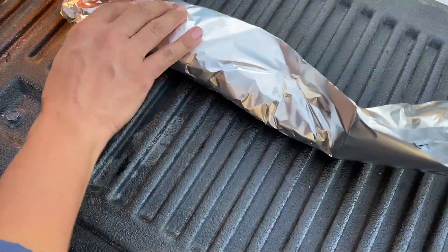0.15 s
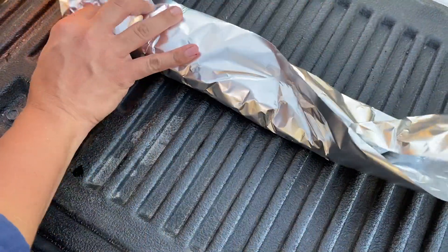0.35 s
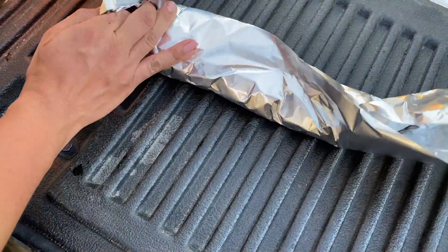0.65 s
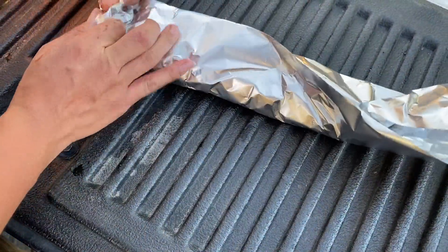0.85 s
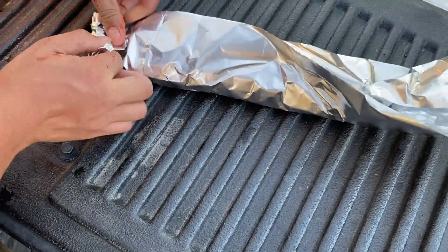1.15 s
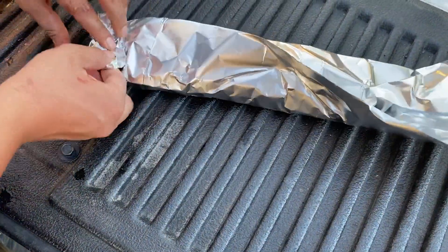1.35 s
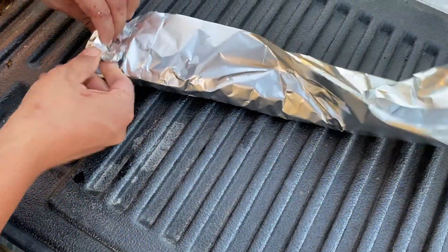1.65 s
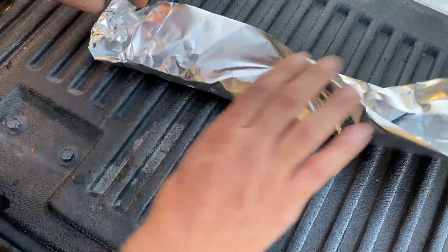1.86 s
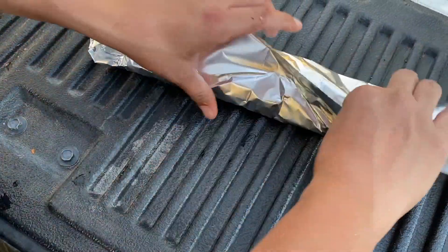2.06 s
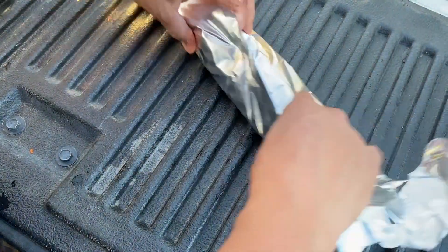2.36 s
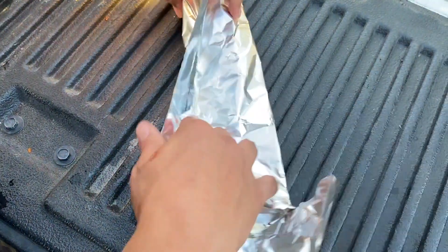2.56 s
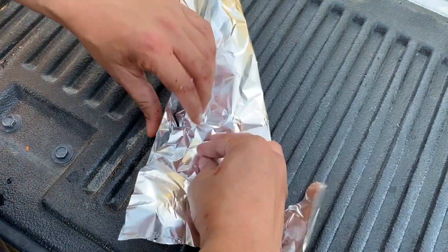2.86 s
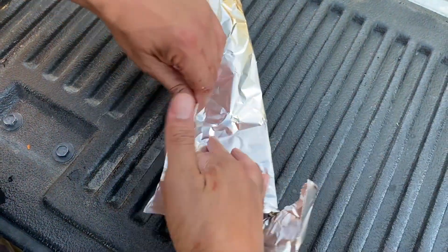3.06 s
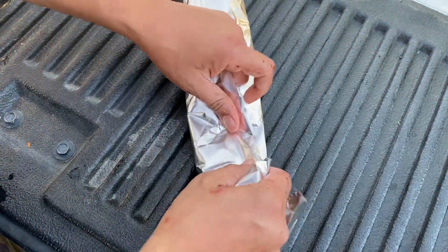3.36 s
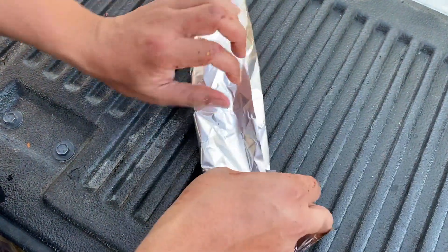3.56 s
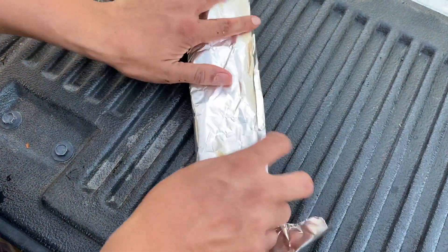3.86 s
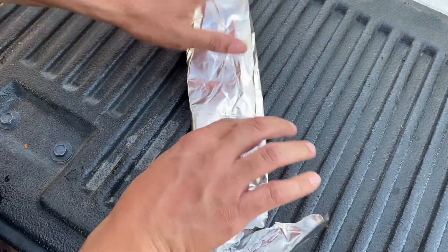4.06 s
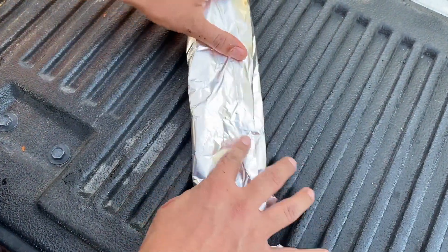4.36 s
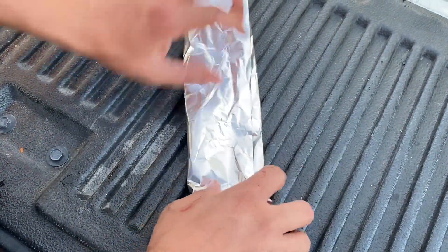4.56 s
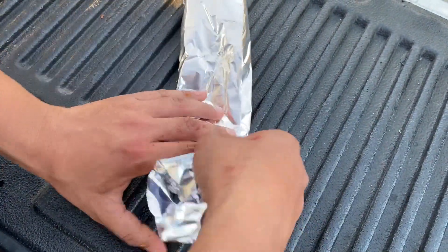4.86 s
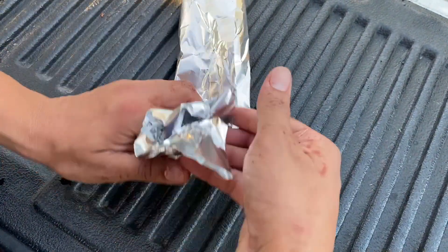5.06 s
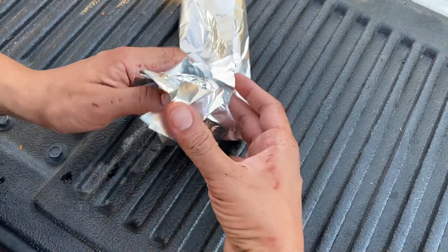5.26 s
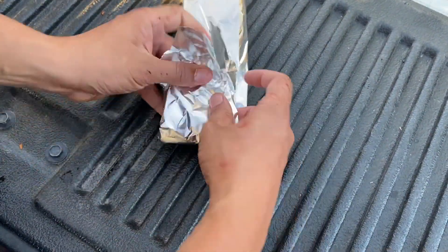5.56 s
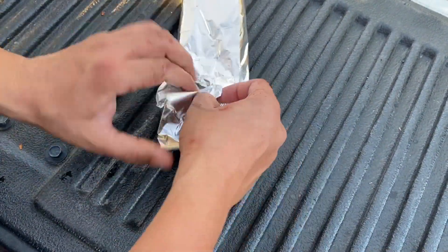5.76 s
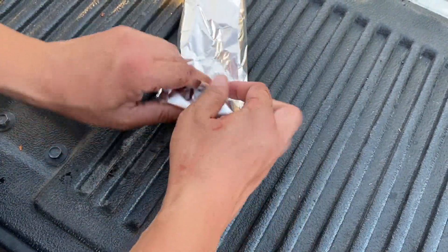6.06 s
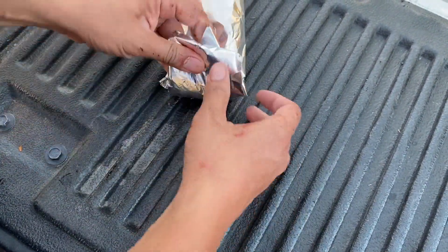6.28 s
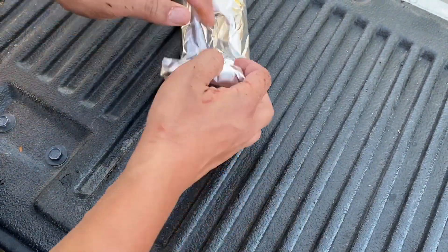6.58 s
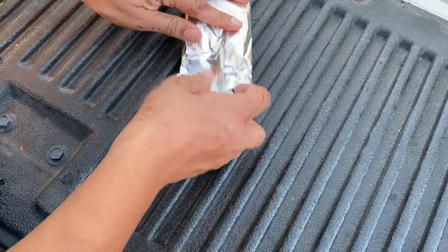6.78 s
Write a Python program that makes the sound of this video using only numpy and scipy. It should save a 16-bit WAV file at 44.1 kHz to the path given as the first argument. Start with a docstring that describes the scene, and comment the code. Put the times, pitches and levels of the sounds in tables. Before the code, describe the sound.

Crisp close foil crinkling in uneven bursts, light at first then busy and loud, over dull knocks and brief rubs on hollow ribbed plastic.

```python
"""Crimping foil in a truck bed

Hands fold and crimp aluminium foil round a long parcel of food on the plastic liner of a truck bed.
The foil buckles in swarms of tiny clicks and sharp single snaps; taut panels pop and one slip squeaks.
The parcel bumps and slides on the hollow liner, shaped noise with low resonances, in quiet outdoor air.
The bed adds short decaying echoes; two close ports hear it all and are cross-fed to widen the image.
"""
import sys
import numpy as np
from scipy import signal
from scipy.fft import rfft, irfft, next_fast_len
from scipy.io import wavfile
from scipy.ndimage import uniform_filter1d, map_coordinates

SR = 44100
rng = np.random.default_rng(int(sys.argv[2]) if len(sys.argv) > 2 else 0)


def store_pcm(level_fs):
    """Save levels as 16-bit WAV."""
    pcm = np.round(np.clip(level_fs, -1, 1) * 32767).astype(np.int16)
    wavfile.write(sys.argv[1], SR, np.atleast_2d(pcm).T)


N = 305157  # length [samples]
TOP_HZ = 15900  # band limit


def amp(db):
    """Level law: decibels to amplitude gain."""
    return 10 ** (np.asarray(db) / 20)


def power(db):
    """Level law: decibels to power, with a floor far below hearing."""
    return np.exp(np.maximum(db, -200) * np.log(10) / 10)


def unit(x):
    """Normalisation to an rms of 1."""
    return x / np.sqrt(np.mean(x ** 2) + 1e-20)


def along(points, hz):
    """Interpolation of (frequency, value) points on a logarithmic frequency axis."""
    f, v = np.transpose(points)
    return np.interp(np.log(hz + 1), np.log(f + 1), v)


def filtered(x, response):
    """Linear filtering: the spectrum of x times a response of frequency."""
    m = next_fast_len(N + SR // 2)
    spectrum = rfft(x, m) * response(np.fft.rfftfreq(m, 1 / SR))
    return irfft(spectrum, m)[..., :N]


def coloured(x, spectrum):
    """Spectral shaping of x by a table of levels, at rms 1."""
    return unit(filtered(x, lambda hz: amp(along(spectrum, hz))))


def placed(times, sounds):
    """Superposition of sounds (channels, events, samples) starting at their times."""
    starts = np.maximum(times * SR, 0).astype(int)
    at = (starts[:, None] + np.arange(sounds.shape[-1])).ravel()
    return np.array([np.bincount(at, side.ravel(), N)[:N] for side in sounds])


def wobble(rate):
    """Random modulation: a smooth curve with rate knots a second."""
    knots = rng.standard_normal(N // 100)
    return map_coordinates(knots, [np.arange(N) * rate / SR], mode="mirror")


def wide(shape, side_db=-14):
    """Partial coherence: noise of a broad surface, mostly shared by the ports, a little of it opposed."""
    mid, side = rng.standard_normal((2, *shape))
    return np.array([mid + amp(side_db) * side, mid - amp(side_db) * side])


def hand_time(size=32):
    """Control-rate sampling: times [s] coarse enough for the slow movements of the hands."""
    return np.arange(0, N, size) / SR


def per_sample(control):
    """Linear interpolation of a slow control to one value per sample."""
    return np.interp(np.arange(N) / SR, hand_time(), control)


# crackle builds as the fingers bear down and falls soon after they let go
GRIP_DB_PER_S, RELEASE_DB_PER_S = 1051.5, 749.5
# the foil keeps settling: level under the push, then a slower fade
SETTLE_DB, SETTLE_DB_PER_S = -16, 216


def stroke(start, length, db, swell_db):
    """Exponential build and relaxation: dB level of one push, which swells or eases, lets go and settles."""
    t = hand_time() - start
    early, late = np.maximum(-t, 0), np.maximum(t - length, 0)
    held = db + swell_db * (np.clip(t / length, 0, 1) - .5)
    release = np.maximum(-RELEASE_DB_PER_S * late, SETTLE_DB - SETTLE_DB_PER_S * late)
    return held + release - GRIP_DB_PER_S * early


# spectrum of the open air: (frequency [Hz], relative level [dB])
AIR_SPECTRUM = [(70, 4), (250, 44), (1000, 37), (16000, -66)]


def air(level_db=-74.5):
    """Diffuse field: steady shaped noise, independent at the two ports."""
    return amp(level_db) * coloured(rng.standard_normal((2, N)), AIR_SPECTRUM)


# ring time of the side walls: (frequency [Hz], 60 dB decay time [s])
BED_DECAY = [(200, 0.28), (2000, 0.84), (14000, 0.0057)]


def bed(x, near_db=-11, far_db=-22):
    """Reverberation: the ribbed floor answers at once, duller than the foil; the side walls ring longer."""
    near_t60 = .04  # s
    wall_hz, t, z = signal.stft(rng.standard_normal((2, SR // 4)), SR, nperseg=256)
    decay = amp(-60 * t / along(BED_DECAY, wall_hz)[:, None])
    far = signal.istft(z * decay, SR, nperseg=256)[1]
    near = rng.standard_normal(far.shape) * amp(-60 * np.arange(far.shape[1]) / SR / near_t60)
    echo = amp(near_db) * near / np.linalg.norm(near[0]) + amp(far_db) * far / np.linalg.norm(far[0])
    dull = filtered(x, lambda hz: 1 / (1 + (hz / 11000) ** 2))
    delayed = np.pad(dull, ((0, 0), (SR // 1000, 0)))  # 1 ms
    return signal.fftconvolve(delayed, echo, axes=1)[:, :N]


# spectrum of the hollow liner, for slides and bumps: (frequency [Hz], relative level [dB])
LINER_SPECTRUM = [(25, -11), (60, 10.5), (205, 2), (470, 0.5), (620, -4.5), (1200, -2), (4000, -10)]
# the parcel is dragged over the liner: (start [s], length [s], relative level midway [dB],
# swell from start to end [dB], centre of the rumble [Hz])
DRAG_STROKES = [(0.023, 0.27, -58.5, -11.5, 130), (1.822, 0.19, -55, 0, 95), (2.077, 0.49, -47, 3, 324),
                (3.298, 0.32, -54, -7, 93.5), (5.766, 0.43, -58.5, 3.5, 196),
                (6.478, 0.092, -66, -4.5, 394)]
SHAKE_DB, SHAKE_HZ = -22.5, 477  # liner shaken by the hands: level relative to the crackle, band centre


def slide(crackle_db, rough_db=4.5, catches_per_s=45, width=1.856):
    """Friction excitation: the parcel catches on the ribs, the liner rumbles; the hands shake it too."""
    rub = coloured(wide((N,)), LINER_SPECTRUM)

    def rumble(hz):
        """Band-pass resonance of the rubbed liner, from hz / width to hz * width."""
        band = signal.butter(2, [hz / width, hz * width], "band", fs=SR, output="sos")
        return unit(signal.sosfilt(band, rub))

    drags = sum(per_sample(amp(stroke(*push))) * rumble(hz) for *push, hz in DRAG_STROKES)
    shaken = amp(crackle_db + SHAKE_DB) * rumble(SHAKE_HZ)
    return (drags + shaken) * amp(rough_db * wobble(catches_per_s))


# the parcel bumps on the liner: (time [s], relative peak level [dB], reference pitch [Hz])
PARCEL_BUMPS = [(0.085, -34, 370), (1.237, -41, 260), (1.469, -38.5, 142), (1.674, -34, 370),
                (1.698, -35, 188), (3.322, -31, 158), (3.379, -31.5, 166), (3.519, -32.5, 133),
                (3.557, -33.5, 182), (3.662, -33, 204), (3.682, -30, 148), (4.101, -44, 308),
                (4.608, -31.5, 264), (4.716, -28.5, 223), (5.663, -27, 276), (6.015, -37, 240),
                (6.135, -36, 204), (6.254, -38.5, 380), (6.81, -36, 292)]


def bumps(octaves=0.52, size=8192):
    """Impact excitation: a short knock on the hollow liner, with a lower thud as the weight settles."""
    s, db, pitch = np.transpose(PARCEL_BUMPS)
    lead_s = .01
    t, hz = np.maximum(np.arange(size) / SR - lead_s, 0), np.fft.rfftfreq(size, 1 / SR)

    def shudder(ratio, t60, attack):
        """Modal density: decaying noise round a multiple of the reference pitch."""
        shake = wide((len(s), size)) * amp(-60 * t / t60) * (1 - np.exp(-t / attack))
        hump = np.exp(-.5 * (np.log2((hz + 1) / (ratio * pitch[:, None])) / octaves) ** 2)
        return irfft(rfft(shake) * hump * amp(along(LINER_SPECTRUM, hz)))

    knock = shudder(ratio=1.55, t60=0.1, attack=0.0011)
    thud = shudder(ratio=0.95, t60=0.23, attack=0.0019)
    ring = knock + thud
    gain = amp(db + 1.0) / np.abs(ring).max((0, 2))
    return placed(s - lead_s, ring * gain[:, None])


def squeak(at_s=5.92, spread_s=.014, level_db=-35, pitch_hz=3220, width_hz=140):
    """Frictional resonance: one slip of foil on foil swells and fades in a narrow band of noise."""
    ring = unit(filtered(rng.standard_normal(N), lambda hz: 1 / (1 + ((hz - pitch_hz) / width_hz) ** 2)))
    swell = np.exp(-2 * ((np.arange(N) / SR - at_s) / spread_s) ** 2)
    return amp(level_db) * ring * swell


# taut panels that pop over and ring: (time [s], relative level [dB], lowest mode [Hz])
PANEL_POPS = [(0.185, -35.5, 2877), (0.257, -40, 1063), (0.778, -50, 1420), (1.292, -47.5, 1900),
              (2.998, -34, 3060), (3.346, -29.5, 1300), (3.65, -37.5, 1160), (4.179, -32, 930),
              (4.267, -34.5, 1130), (4.448, -38.5, 1450), (5.772, -41, 980), (5.962, -43, 990),
              (6.012, -40.5, 2000)]


def pops(t60=0.016, attack=0.00038, overtone_db=-7, size=2048):
    """Snap-through: a taut panel flips and rings in a few close modes, the lowest the strongest."""
    s, db, hz = np.transpose(PANEL_POPS)
    t = np.arange(size) / SR
    ratios = np.array([1, 1.09, 1.42, 1.85])
    phase = rng.random((len(s), len(ratios), 1))  # cycles
    modes = np.sin(2 * np.pi * (hz[:, None, None] * ratios[:, None] * t + phase))
    mixed = (modes * amp(overtone_db * (ratios > 1))[:, None]).sum(1)
    ring = mixed * amp(-60 * t / t60) * (1 - np.exp(-t / attack))
    return placed(s, (ring * amp(db + 10.5)[:, None])[None])


# the fingers press or fold the foil: (start [s], length [s], relative crackle level midway [dB],
# swell from start to end [dB], broad panels relative to the crackle [dB])
FOLD_STROKES = [(0.0, .05, -46, -4.5, -14), (0.097, .175, -45, -5.5, -6.5), (0.335, .015, -36, 0, -11),
                (0.284, .4, -50, -7.5, -12), (0.706, .03, -38.5, -0.5, -12.5), (0.815, .13, -48, -1, -8),
                (0.97, .13, -55, 1.5, -4), (1.16, .1, -48, 2, -4.5), (1.286, .11, -57, -1.5, -1.5),
                (1.455, .085, -39, 2, -7), (1.551, .09, -49.5, -13, -5.5), (1.684, .13, -43, -17, -5),
                (2.039, .1, -39, 6.5, -7.5), (2.149, .56, -36.5, -1.5, -7), (2.794, .035, -48, 8, -6),
                (2.837, .125, -38, -7.5, -5), (2.997, .06, -36, -3.5, -5.5), (3.079, .045, -32, -2.5, -7),
                (3.139, .16, -37, 0, -5.5), (3.307, .14, -36, -3, -4.5), (3.464, .04, -32, -2, -5),
                (3.527, .155, -42, -5, -7.5), (3.785, .19, -32, -3.5, -5), (3.986, .12, -42, 0, -8.5),
                (4.148, .33, -36.5, -3.5, -4.5), (4.518, .16, -39.5, 1, -7), (4.689, .25, -38.5, -11, -4.5),
                (4.986, .11, -40.5, -8, -12), (5.211, .11, -45.5, 4, -11), (5.329, .05, -36, 1, -13),
                (5.387, .15, -50, -8, -7), (5.546, .11, -38, 5, -4), (5.714, .22, -48, -8, -5.5),
                (5.963, .28, -51, -11, -3), (6.395, .065, -47, 5, -7.5), (6.479, .165, -49, -2, -7),
                (6.69, .06, -41, 5, -9.5), (6.755, .15, -36, 1, -6)]
RESTING_DB, RESTING_PANELS_DB = -69, -9  # a resting hand still stirs the foil
# every snap unsettles the creases round it: level relative to the snap's, build and decay rates
FLURRY_DB, STRAIN_DB_PER_S, FLURRY_DB_PER_S = -17.5, 2801.5, 850.5


def effort():
    """Power addition: folds, flurries and the resting hand sum to crease and panel levels in dB."""
    t = hand_time()
    creases = power(RESTING_DB)
    for s, db, _ in CREASE_SNAPS:
        fade_db = np.maximum(STRAIN_DB_PER_S * (s - t), FLURRY_DB_PER_S * (t - s))
        creases = creases + power(db + FLURRY_DB - fade_db)
    panels = creases * power(RESTING_PANELS_DB)
    for *push, panels_db in FOLD_STROKES:
        work = power(stroke(*push))
        creases, panels = creases + work, panels + work * power(panels_db)
    return per_sample(10 * np.log10(creases)), per_sample(10 * np.log10(panels))


def buckles(pitch_hz, t60, octaves, ring_db, ripple_db=6, ring_t60=0.05, lag_ms=0.069,
            scatter_ms=0.08, size=512, count=22):
    """Modal decay: clicks of energy 1, a row per patch of foil; dense modes die at once, the main one later."""
    t, hz = np.arange(size) / SR, np.fft.rfftfreq(size, 1 / SR)
    pitch = pitch_hz.reshape(-1, 1)
    draw = rng.standard_normal((len(pitch), size + 1))
    # every patch has resonances of its own, shared by all its clicks
    ripple = signal.resample(rng.standard_normal((len(pitch_hz), count)), len(hz), axis=1)
    colour = np.repeat(amp(ripple_db * ripple), pitch_hz.shape[1], axis=0)
    hump = np.exp(-.5 * (np.log2((hz + 1) / pitch) / octaves) ** 2)
    crack = rfft(draw[:, 1:] * amp(-60 * t / t60)) * hump * colour
    tone = rfft(np.sin(2 * np.pi * pitch * t) * amp(-60 * t / ring_t60))
    norm = lambda z: np.linalg.norm(z, axis=-1, keepdims=True)
    click = crack / norm(crack) + amp(ring_db) * tone / norm(tone)
    # each facet has its own place between the two ports
    lag_s = (lag_ms + scatter_ms * draw[:, :1]) / 1000
    flight_s = .0008
    delay = lambda side: np.exp(-2j * np.pi * hz * (flight_s + side * lag_s / 2))
    pair = np.array([irfft(click * delay(side), size) for side in (-1, 1)])
    return pair / norm(pair[0])


def swarm(level_db, spectrum, pitch_hz, spread, t60, ring_db, size_db, thinning, count, size, order=3):
    """Avalanche statistics: bursts of buckles, denser the harder the foil is worked, levelled to level_db."""
    busy = np.cumsum(amp(thinning * level_db))
    start = np.interp(rng.random(count), busy / busy[-1], np.arange(N) / SR)
    times = (start[:, None] + rng.exponential(.0025, (count, order))).ravel()
    burst_db = size_db * np.clip(rng.standard_normal((count, 1)), -2, 2)
    sizes = amp(burst_db + 2 * rng.standard_normal((count, order))).ravel()
    # facet size drifts as the fingers move on; the facets of one avalanche are alike
    facet = 0.489 * wobble(25)[(start * (SR - 1)).astype(int)] + rng.standard_normal(count)
    facets = facet[:, None] + 0.291 * rng.standard_normal((count, order))
    pitch = pitch_hz * 2 ** (spread * np.clip(facets, -2, 2))
    # pitches drawn above the band limit are halved, so none pile up at the limit
    pitch = np.where(pitch > TOP_HZ, pitch / 2, pitch)
    clicks = buckles(pitch, t60, 1.0, ring_db, size=size)
    x = coloured(placed(times, clicks * sizes[:, None]), spectrum)
    smooth = uniform_filter1d(uniform_filter1d(np.mean(x ** 2, 0), size=2200), size=1200)
    return amp(level_db) * x / np.sqrt(np.abs(smooth) + 0.0053)


# spectra of small creases and of broad panels: (frequency [Hz], relative level [dB])
CREASE_SPECTRUM = [(120, -19), (1500, -10), (2800, -4), (7500, -7), (11000, -12), (16000, -18.5)]
PANEL_SPECTRUM = [(70, -52), (400, -9), (680, -10), (980, 2), (1350, -1.5), (1900, 3), (4500, 0),
                  (12000, -58)]


def crinkle(crackle_db, panel_db):
    """Size scaling: small creases tick brightly, broad panels crumple lower, layers brush softly."""
    fine = swarm(crackle_db - 2.0, CREASE_SPECTRUM, 5139, spread=0.62, t60=.006, ring_db=-4,
                 size_db=3.5, thinning=.37, count=1900, size=384)
    broad = swarm(panel_db - 0.5, PANEL_SPECTRUM, 1564, spread=0.626, t60=.007, ring_db=-2.5,
                  size_db=1.5, thinning=.44, count=800, size=512)
    brush = coloured(rng.standard_normal((2, N)), CREASE_SPECTRUM)
    brush = brush + amp(panel_db - crackle_db) * coloured(rng.standard_normal(N), PANEL_SPECTRUM)
    soft_hz, brush_db, catch_db = 10000, -11, 2.5
    brush = filtered(brush, lambda hz: 1 / (1 + (hz / soft_hz) ** 2))
    return fine + broad + amp(crackle_db + brush_db + catch_db * wobble(76)) * brush


# creases that snap through: (time [s], relative level [dB], centre pitch [Hz])
CREASE_SNAPS = [(0.0349, -26, 11200), (0.0874, -23, 11600), (0.107, -17, 2780), (0.163, -24.5, 12000),
                (0.186, -26, 5500), (0.2483, -25.5, 6190), (0.333, -26, 7360), (0.549, -29.5, 11400),
                (0.592, -27, 6300), (0.6946, -28.5, 4610), (0.7786, -25, 3780), (0.8637, -21, 6040),
                (1.1509, -25, 4230), (1.2348, -25, 5200), (1.3682, -29, 10900), (1.414, -26, 6570),
                (1.434, -25, 4550), (1.6766, -22.5, 2950), (1.8544, -35, 3600), (2.164, -15.5, 4860),
                (2.311, -20, 2770), (2.332, -19.5, 2480), (2.498, -18, 2630), (2.611, -20, 1790),
                (2.8353, -20, 3550), (2.8868, -18.5, 3200), (2.9374, -21, 3200), (2.9783, -21, 2500),
                (3.004, -18, 2890), (3.168, -22, 3410), (3.218, -21, 3220), (3.316, -18.5, 2110),
                (3.405, -18.5, 6900), (3.563, -26, 3080), (3.6489, -25.5, 5740), (3.7906, -19, 3380),
                (3.895, -17.5, 1990), (4.143, -22, 8160), (4.1756, -15.5, 4980), (4.27, -19, 2500),
                (4.325, -19, 3130), (4.341, -18.5, 3470), (4.4458, -19.5, 4550), (4.5234, -23, 11100),
                (4.802, -19.5, 1910), (4.8454, -21.5, 4530), (4.8938, -18, 4500), (4.971, -23.5, 4540),
                (4.988, -21, 4590), (5.117, -30, 4130), (5.1445, -19, 6130), (5.172, -14, 4540),
                (5.196, -22, 11660), (5.3053, -19, 6840), (5.7053, -23, 5400), (5.756, -27.5, 1820),
                (5.785, -27.5, 4030), (5.819, -26.5, 4830), (6.1724, -25, 3230), (6.1831, -23, 4540),
                (6.3, -37, 6400), (6.443, -30.5, 2930)]


def snaps(gap_s=0.0026, lead_db=-5, order=4):
    """Stepwise buckling: a crease gives a small lead-in, a needle-sharp break and two weaker aftershocks."""
    fall_db = 6  # per step away from the break
    s, db, hz = np.transpose(CREASE_SNAPS)[:, :, None]
    step = np.arange(order) - 1
    when = s + .0004 + step * gap_s * rng.uniform(0.55, 1, (len(s), order))
    pitch = hz * 2 ** (0.253 * np.clip(rng.standard_normal(when.shape), -2, 1))
    size_db = db + 9.5 - fall_db * abs(step) + lead_db * (step < 0)
    clicks = buckles(pitch, t60=.0048, octaves=1.0, ring_db=-2, ripple_db=9.0)
    return placed(when.ravel(), clicks * amp(size_db).reshape(-1, 1))


# each grip stretches the wrapper anew and it rings differently: (start [s], main resonance [Hz],
# second resonance [Hz], gain of the main resonance [dB])
WRAPPER_GRIPS = [(0, 6000, 1420, -9.5), (2.03, 1840, 3200, -0.5), (2.78, 2230, 3270, -5.5),
                 (3.74, 5200, 1170, -12.5), (5.68, 926, 4800, 5), (6.3, 1900, 3100, -10.5)]
SECOND_RING_DB, WRAPPER_Q = -4, 8  # second resonance relative to the main; sharpness of both


def wrapper(x):
    """Resonant filtering: the crackle rings in two resonances of the sheet as it is held just then."""
    grip = np.searchsorted([s for s, *_ in WRAPPER_GRIPS[1:]], np.arange(N) / SR)
    ring = lambda v, hz: signal.lfilter(*signal.iirpeak(hz, WRAPPER_Q, SR), v)
    out = x.copy()
    for k, (_, main_hz, second_hz, db) in enumerate(WRAPPER_GRIPS):
        held = x[:, grip == k]
        rung = ring(held, main_hz) + amp(SECOND_RING_DB) * ring(held, second_hz)
        out[:, grip == k] += amp(db) * rung
    return out


def scene():
    """Superposition of foil and liner in the truck bed, over quiet outdoor air."""
    crackle_db, panel_db = effort()
    foil = wrapper(crinkle(crackle_db, panel_db) + snaps()) + pops() + squeak()
    direct = foil + bumps() + slide(crackle_db)
    return direct + bed(direct) + air()


# share of each port taken off the other channel: (frequency [Hz], share [0 to 1])
CROSSFEED = [(3500, 0.0077), (5200, 0.014), (6800, 0.76), (9000, 0.94), (16000, 1)]
# the port that faces the foil gets more treble: (frequency [Hz], right minus left port [dB])
PORT_FACING = [(100, 0), (500, -2), (5500, -2.5), (7500, 11.5), (16000, 33.5)]


def record(dry):
    """Pressure-gradient pickup: each port minus the delayed other one, up to the band limit."""
    port_s = .000225  # delay of the other port
    ports = filtered(dry, lambda hz: amp(np.outer([-.5, .5], along(PORT_FACING, hz))))
    share = lambda hz: np.clip(along(CROSSFEED, hz), 0, 1)
    crossed = filtered(ports[::-1], lambda hz: share(hz) * np.exp(-2j * np.pi * hz * port_s))
    return filtered(ports - crossed, lambda hz: (hz < TOP_HZ) / np.sqrt(1 + share(hz) ** 2))


dry = scene()
out = record(dry)
store_pcm(out)
```